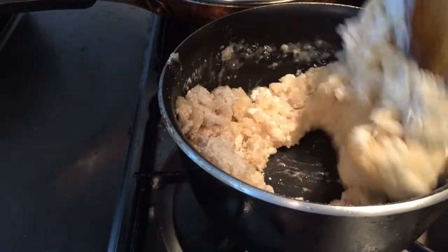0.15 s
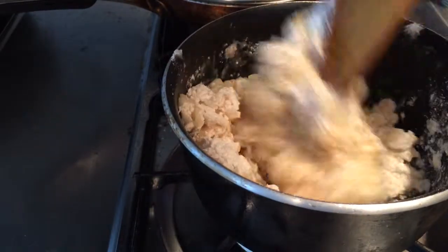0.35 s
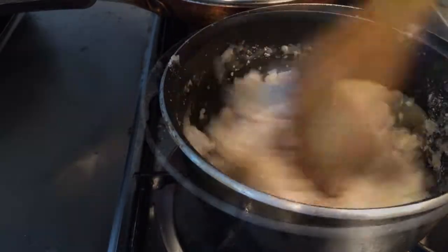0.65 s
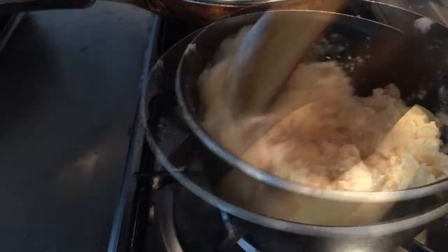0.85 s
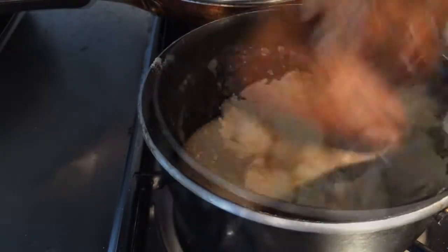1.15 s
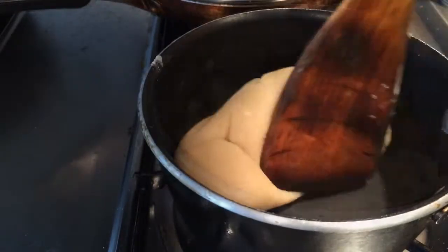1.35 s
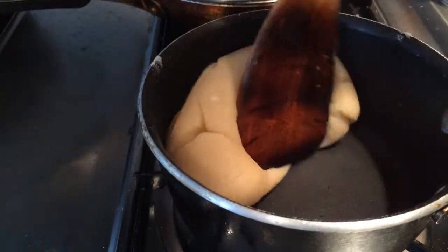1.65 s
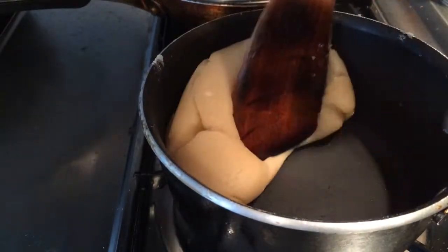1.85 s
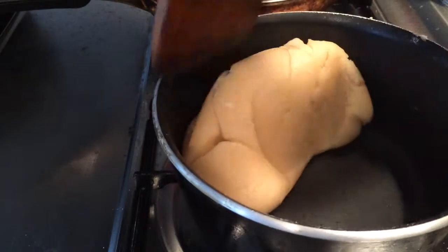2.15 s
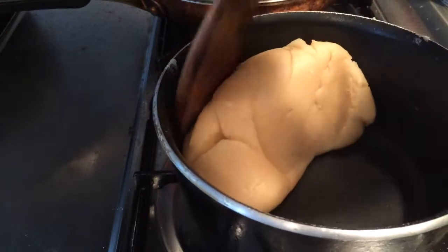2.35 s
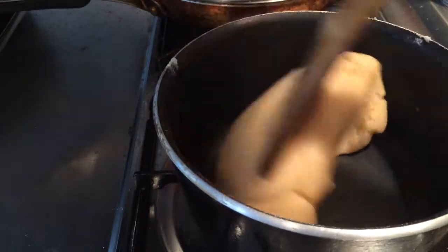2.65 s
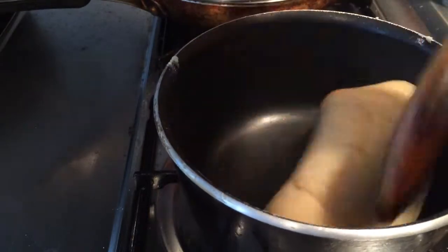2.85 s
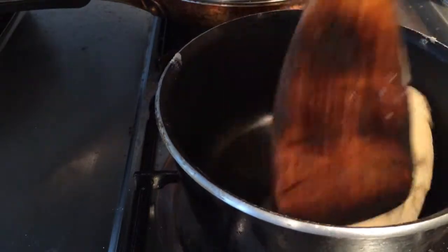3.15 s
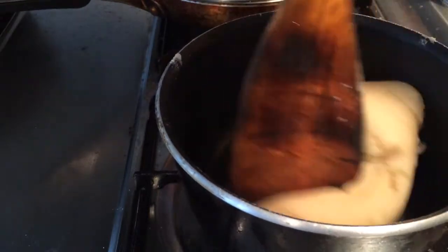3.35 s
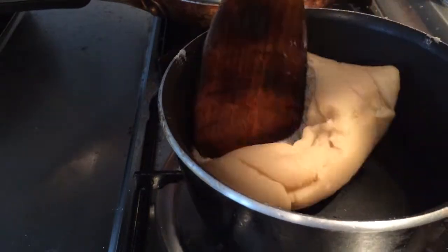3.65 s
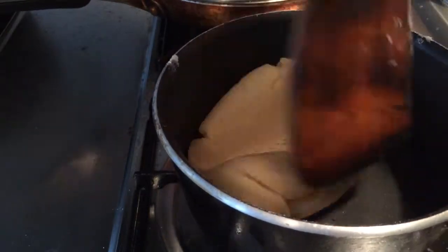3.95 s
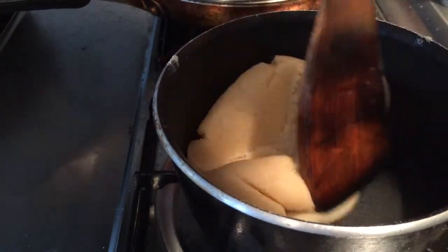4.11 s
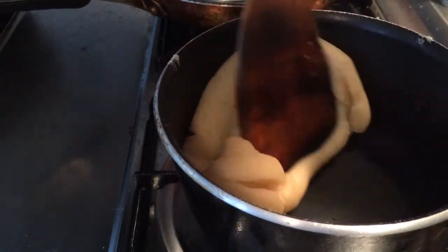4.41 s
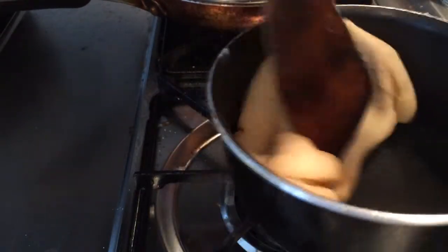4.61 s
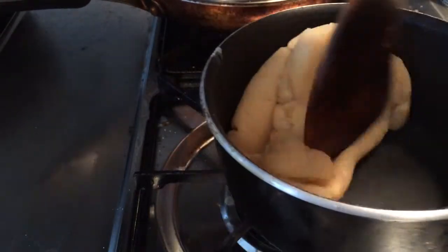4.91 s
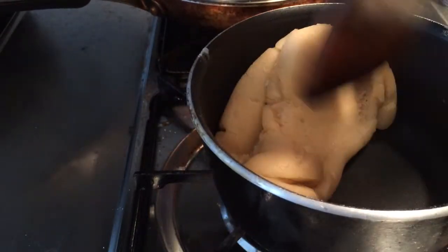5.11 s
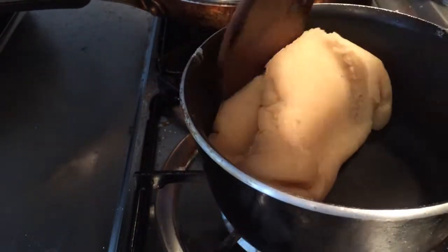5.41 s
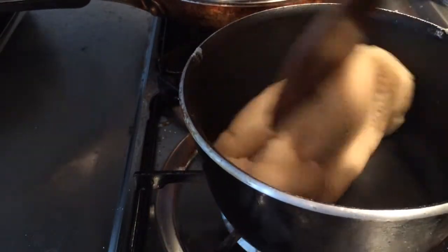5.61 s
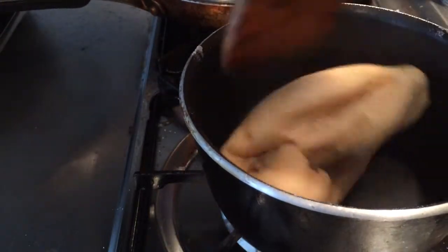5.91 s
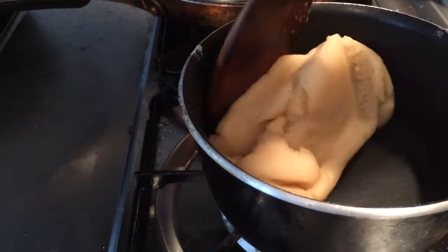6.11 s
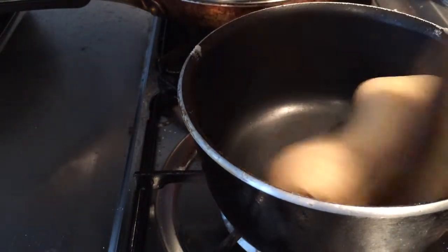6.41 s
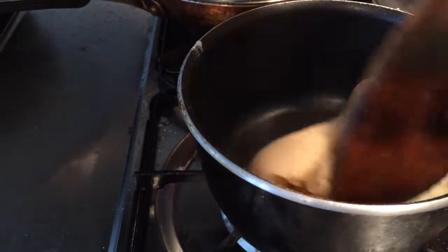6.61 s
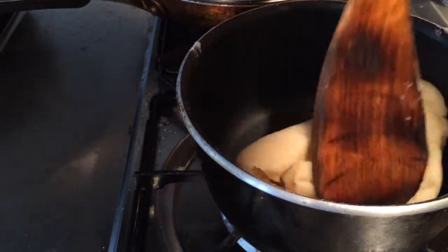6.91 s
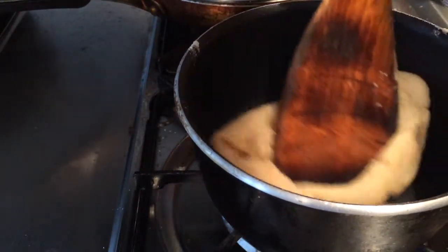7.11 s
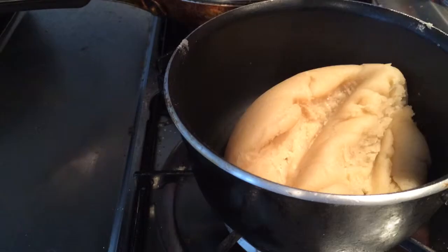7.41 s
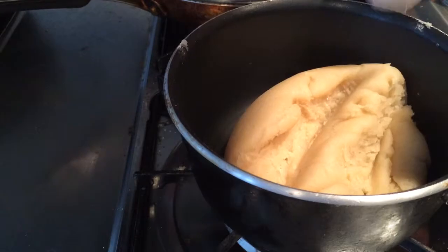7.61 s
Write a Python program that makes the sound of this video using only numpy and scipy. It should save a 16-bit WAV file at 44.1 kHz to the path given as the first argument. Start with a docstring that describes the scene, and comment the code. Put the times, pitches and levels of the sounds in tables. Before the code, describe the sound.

A gas burner rumbles softly throughout, close by in a small kitchen. From the start a wooden spoon rubs through stiff dough in a metal saucepan with a sticky crackle, busiest in the first second, then in quieter, uneven strokes. The spoon knocks the pan at 0.5 seconds, harder at 1.3, again at 2.4, and more lightly at 3.4 and 3.8, each knock short and damped. A small wet smack comes at 1.8, a rasping scrape at 1.9, and two short low groans of slipping wood around 3.3. A very faint gas whistle runs from about 4 to 7 seconds. Around 4.6 a scrape, clustered knocks and a smack jolt the pan on its grate. A loud knock with smaller rebounds lands just after 6. At 7.3 the level dips for an instant and a short swish passes; at 7.6 something hard hits metal with one bright clack.

```python
"""A gas burner rumbles in a small kitchen while a wooden spoon works stiff dough in a metal saucepan.
From the start the blade rubs and the sticky dough crackles; soon the spoon knocks the wall and jolts
the pan on its grate. Then come wet smacks of dough, sudden scrapes and two short groans as the blade
sticks and slips. A faint gas whistle joins halfway. At the end the level dips for an instant,
a short swish passes, and something hard hits metal with one bright clack."""
import sys
import numpy as np
from scipy import signal
from scipy.io import wavfile

SR = 44100
rng = np.random.default_rng(int(sys.argv[2]) if len(sys.argv) > 2 else 0)


def transcribe(u):
    """Save the signal u as a 16-bit wav file named by the first command-line argument.

    u: samples, shape (n,) or (channels, n), limited to [-1, 1]; the rate is SR.
    q: integer samples, one column per channel.
    """
    v = np.clip(np.atleast_2d(u).T, -1, 1)
    q = np.round(v * 32767).astype(np.int16)
    wavfile.write(sys.argv[1], SR, q)


N = 342237
TIME = np.arange(N) / SR


def amp(db):
    """Turns decibels into a gain to multiply by."""
    return 10 ** (np.asarray(db) / 20)

def unit(x):
    """Scales a signal to an average (rms) level of 1."""
    return x / np.sqrt(np.mean(x ** 2) + 1e-20)

def add(mix, start, sound):
    """Mixes a sound in at a start time in seconds."""
    part = mix[max(0, round(start * SR)):][:len(sound)]
    part += sound[:len(part)]

def value_at(points, hz):
    """Reads between rows of frequency and value, on a log-frequency scale."""
    known_hz, values = np.transpose(points)
    return np.interp(np.log(hz + 1), np.log(known_hz + 1), values)

def colour(x, tone, size=4096):
    """Filters a sound to a tone curve; white noise would keep its overall level."""
    log_gain = np.log(amp(value_at(tone, abs(np.fft.fftfreq(size, 1 / SR)))))
    taps = np.fft.ifft(np.exp(np.conj(signal.hilbert(log_gain)))).real[:size // 2]
    return signal.oaconvolve(x, taps / np.linalg.norm(taps))[:len(x)]

def wander(per_s):
    """A random curve that drifts to a new value per_s times a second."""
    times = np.arange(0, N / SR + 1, 1 / per_s)
    return unit(np.interp(TIME, times, rng.standard_normal(N)[:len(times)]))

def clicks(per_s, spread_db):
    """Randomly timed clicks of uneven size."""
    size = amp(spread_db * np.minimum(rng.exponential(1, N), 4))
    return unit(size * rng.choice([-1., 1.], N) * (rng.random(N) < per_s / SR))

def burst(t, decay_s):
    """Noise that starts at once and dies away."""
    return rng.standard_normal(len(t)) * np.exp(-t / decay_s)

def struck(notes):
    """A struck object's notes start together; each fades by 60 dB over its ring time."""
    t = TIME[:SR // 2]
    return sum((-1) ** k * amp(db - 60 * t / ring_s) * np.sin(2 * np.pi * hz * t)
               for k, (hz, db, ring_s) in enumerate(notes))

def ringing(notes, clatter_share, clatter_s):
    """Metal after a tap: a few clear notes over a noisy clatter of many short ones."""
    t = TIME[:SR // 2]
    clatter = rng.choice([-1., 1.], len(t)) * amp(-60 * t / clatter_s) * (1 - np.exp(-t / 0.0035))
    ring = np.sqrt(1 - clatter_share) * unit(struck(notes)) + np.sqrt(clatter_share) * unit(clatter)
    return ring / np.sqrt(len(t))

def push(middle, length):
    """Gain of one push of the arm: it builds, holds and eases off."""
    build_share, ease_share = 0.38, 0.39
    progress = (TIME - middle) / length + .5
    return np.clip(np.minimum(progress / build_share, (1 - progress) / ease_share), 0, 1)

def drag(start, length):
    """Gain of one scrape or press: the blade bites, holds and lets go."""
    bite_s, let_go_s = 0.029, 0.023
    t = TIME - start
    return np.clip(t / bite_s, 0, 1) * np.exp(-np.maximum(t - length, 0) / let_go_s)

# The flame's tone. Each row: frequency in Hz, relative level in dB.
FLAME_TONE = [(20, -32.5), (40, -8.5), (62, 1), (100, 1), (200, -0.5), (310, -5), (500, -12.5),
              (900, -24.5), (2000, -29.5), (5000, -38), (15500, -32.5)]

def burner():
    """The gas flame makes a low, softly fluttering rumble."""
    flutter = amp(1.3 * wander(per_s=12))
    return amp(-56.5) * colour(rng.standard_normal(N), FLAME_TONE) * flutter

# Light contact that never stops, quieter once the crumbs bind into one lump.
# Each row: time in seconds, rubbing in dB, sticky fizz in dB.
LIGHT_CONTACT = [(0, -53.5, -51), (0.55, -56, -57.5), (1.25, -59, -61.5), (1.7, -63, -67.5),
                 (3.1, -68, -77), (6.95, -73.5, -73), (7.5, -65, -62.5), (7.62, -62.5, -71)]
# Strokes through the dough. Each row: middle and length in seconds, rubbing and fizz in dB,
# the pan note it stirs most in Hz.
SPOON_STROKES = [(0.037, 0.23, -44, -50.5, 910), (0.697, 0.083, -48, -54, 1920),
                 (0.83, 0.21, -47.5, -53.5, 930), (1.002, 0.19, -45, -47.5, 943),
                 (1.312, .12, -55, -58, 950), (1.836, 0.043, -57, -66, 905), (2.364, 0.22, -62, -67, 1000),
                 (2.568, 0.12, -78, -49.5, 990), (2.606, 0.089, -61, -42, 960),
                 (2.74, 0.56, -88, -60.5, 936), (2.904, 0.23, -62, -70, 970),
                 (3.49, 0.44, -57.5, -58.5, 1220), (3.581, .11, -44, -58, 927),
                 (3.846, 0.2, -55, -55, 1020), (4.105, 0.071, -67, -61.5, 950),
                 (4.496, 0.52, -68.5, -57.5, 950), (4.802, 0.23, -54, -51, 3120),
                 (5.0, 0.23, -58, -55.5, 960), (5.087, 0.17, -44.5, -48, 935), (5.372, 0.2, -54, -60, 940),
                 (5.475, 0.16, -49, -56, 1970), (5.654, 0.32, -65, -50.5, 930),
                 (5.806, .08, -60.5, -63.5, 990), (5.96, 0.66, -68, -65, 950),
                 (6.29, 0.32, -60.5, -58, 2230), (6.483, 0.15, -57.5, -53.5, 946),
                 (6.625, 0.096, -50, -54.5, 1854), (7.068, 0.16, -61, -71, 930),
                 (7.295, 0.4, -61, -62.5, 943)]
# The blade's edge dragged along the wall.
# Each row: start and length in seconds, then rasp, rubbing and fizz in dB.
WALL_SCRAPES = [(1.935, 0.087, -37.5, -45.5, -39), (3.258, 0.05, -58.5, -48.5, -62.5),
                (3.689, 0.034, -78, -50.5, -63), (4.562, 0.11, -37.5, -36, -34)]

def friction():
    """Gains of rubbing, fizz and rasp: light contact, strokes and scrapes add up in power."""
    times, rub_db, fizz_db = np.transpose(LIGHT_CONTACT)
    rub = amp(np.interp(TIME, times, rub_db)) ** 2
    fizz = amp(np.interp(TIME, times, fizz_db)) ** 2
    rasp = np.zeros(N)
    for middle, length, rub_db, fizz_db, _ in SPOON_STROKES:
        power = push(middle, length) ** 2
        rub += amp(rub_db) ** 2 * power
        fizz += amp(fizz_db) ** 2 * power
    for start, length, rasp_db, rub_db, fizz_db in WALL_SCRAPES:
        power = drag(start, length) ** 2
        rub += amp(rub_db) ** 2 * power
        fizz += amp(fizz_db) ** 2 * power
        rasp += amp(rasp_db) ** 2 * power
    return np.sqrt([rub, fizz, rasp])

def singing():
    """Each stroke brings out one note of the pan, which the dough damps to a fuzzy band."""
    width_hz, below_rub_db = 90, 5.5
    slips = clicks(per_s=3500, spread_db=3.5)
    out = np.zeros(N)
    for middle, length, rub_db, _, hz in SPOON_STROKES:
        note = unit(signal.lfilter(*signal.iirpeak(hz, hz / width_hz, SR), slips))
        out += note * amp(rub_db - below_rub_db) * push(middle, length)
    return out

# Resonances of the air in the pan. Each row: pitch in Hz, width in Hz, level in dB.
PAN_AIR = [(927, 56, 1), (1204, 22, -8.5), (1620, 260, -6), (2075, 130, -0.5)]

def hollow(x):
    """The air in the pan lifts a few bands of a sound."""
    return x + sum(amp(db) * signal.lfilter(*signal.iirpeak(hz, hz / width, SR), x)
                   for hz, width, db in PAN_AIR)

# The pan's dull thud. Each row: frequency in Hz, relative level in dB.
THUD_TONE = [(25, -24), (65, -11.5), (190, 2), (330, -20.5), (600, -18), (2000, -44.5)]
# Shoves against the pan. Each row: middle in seconds, length in seconds, level in dB.
DOUGH_SHOVES = [(0.056, 0.24, -47), (0.499, 0.15, -48), (4.58, 0.064, -52.5), (4.7, 0.1, -38)]

def shoves():
    """The lump of dough shoves the pan about with a low noise."""
    gain = sum(amp(db) * push(middle, length) for middle, length, db in DOUGH_SHOVES)
    return colour(rng.standard_normal(N), THUD_TONE) * gain

# Tones of rubbing wood, sticky dough and the scraping edge.
# Each row: frequency in Hz, relative level in dB.
RUB_TONE = [(40, -18.5), (110, 3.5), (350, -6.5), (600, 1), (950, 0), (1400, -4), (2200, -6.5),
            (3300, -7.5), (5000, -11), (9000, -15), (16000, -48)]
FIZZ_TONE = [(300, -45.5), (1500, -8.5), (3000, -5.5), (5000, -4), (8000, -1), (11000, -2), (15500, -1)]
RASP_TONE = [(300, -37), (1000, -1), (2200, -4.5), (3050, -0.5), (3600, 0.5), (4300, -17.5), (5000, -5.5),
             (6400, -13), (7900, -7.5), (9500, -19.5), (15500, -23.5)]
# The pan's notes, damped by dough. Each row: pitch in Hz, relative level in dB, ring time in seconds.
PAN_NOTES = [(484, -4.5, .16), (665, 1, .22), (877, -1, .3), (981, 3, .22), (1108, -3, .14),
             (1268, 4.5, .24), (1640, 7, .1), (1790, 2, .12), (1970, 1, .27), (2280, 3, .22), (3100, 2, .3),
             (3550, -5, .16), (4180, -12, .22), (4900, -6, .2), (6400, -7.5, .12), (8035, 1, .09),
             (8680, -2, .1)]

def stirring():
    """Tiny slips of the spoon ring the pan; dough peeling off the metal fizzes and ticks."""
    rub_gain, fizz_gain, rasp_gain = friction()
    grip = amp(2.2 * np.tanh(wander(per_s=110)))
    slips = colour(clicks(per_s=3500, spread_db=0.5), RUB_TONE)
    rub = unit(hollow(slips)) * grip * rub_gain
    wet_film = clicks(per_s=11000, spread_db=4.0)
    bubbles = amp(-4.5) * clicks(per_s=67, spread_db=6.5)
    fizz = colour(unit(wet_film + bubbles), FIZZ_TONE) * fizz_gain * amp(1.3 * wander(per_s=140))
    rasp = colour(clicks(per_s=3100, spread_db=3.5), RASP_TONE) * rasp_gain
    thuds = shoves()
    contact = rub + singing() + fizz + rasp
    pan = ringing(PAN_NOTES, clatter_share=0.91, clatter_s=0.034)
    return contact + thuds + amp(-9.0) * signal.oaconvolve(contact, pan)[:N]

# Notes of the wooden spoon, and of the pan rocking on its grate.
# Each row: pitch in Hz, relative level in dB, ring time in seconds.
SPOON_NOTES = [(482, -4.5, 0.03), (594, -2, 0.02), (1408, 5, 0.0066), (1797, 1, 0.0087),
               (2318, -3.5, 0.013), (3020, -7.5, 0.0095)]
GRATE_NOTES = [(73.4, -3.5, 0.35), (125.5, -1.5, 0.18), (152, -1.5, 0.1), (217.6, -6.5, 0.36),
               (350.8, -3.5, 0.17)]
# Knocks of spoon on pan. Each row: start in seconds, strength in dB, pitch in Hz,
# then sharp crack, low thud and wooden clack in dB relative to that strength.
SPOON_KNOCKS = [(0.489, -15.5, 1110, -23, -21, -11.5), (0.569, -37.5, 1000, -16, -8, -6.5),
                (1.298, -32.5, 1001, -22, -7.5, -10), (1.349, -4.5, 1230, -18.5, -24, -8.5),
                (2.273, -29, 475, -28, -19, -19), (2.408, -12, 722, -29.5, -41, -16.5),
                (3.152, -47.5, 404, -8.5, -33.5, -8), (3.44, -22, 980, -26, -16, -8),
                (3.834, -26.5, 930, -15.5, 3, -3.5), (3.853, -16.5, 980, -29, -11.5, -5.5),
                (3.855, -18.5, 2920, -16.5, -27, -34), (4.575, -21, 420, -3, -1, -9),
                (4.636, -14.5, 980, -20, -19, -13), (4.676, -12, 1010, -21.5, -11.5, -11),
                (4.692, -12, 3060, -7, -27, -11), (4.81, -26.5, 1610, -15.5, -35, -20),
                (6.0515, -3, 1282, -11, -31, -7), (6.0967, -14, 745, -24.5, -19, -11.5),
                (6.118, -17.5, 584, -16, -14, -7.5), (6.516, -23.5, 930, -25, -11.5, -0.5)]

def knocks():
    """Wood hits metal: a very short note, a crack, a thud through the grate and a ringing pan."""
    out, t = np.zeros(N), TIME[:SR // 2]
    for start, db, hz, crack_db, thud_db, wood_db in SPOON_KNOCKS:
        cycles = hz * t
        note = np.sin(2 * np.pi * cycles) * np.exp(-cycles / 1.67) * (1 - np.exp(-cycles / 0.53))
        snap_and_chatter = 8 * signal.unit_impulse(len(t)) + 1.3 * burst(t, decay_s=0.0027)
        crack = amp(crack_db) * colour(snap_and_chatter, CRACK_TONE)
        jolt = 0.36 * struck(GRATE_NOTES) + 0.32 * colour(burst(t, decay_s=0.011), THUD_TONE)
        blow = 1.16 * note + crack + amp(wood_db) * struck(SPOON_NOTES)
        pan = ringing(PAN_NOTES, clatter_share=0.99, clatter_s=.06)
        ring = signal.fftconvolve(blow, pan)[:len(t)]
        add(out, start, amp(db) * (blow + amp(thud_db) * jolt + amp(-1.5) * ring))
    # so small a pan gives off almost no deep bass
    return signal.sosfilt(signal.butter(2, 48, "highpass", fs=SR, output="sos"), out)

# Dough letting go of the blade. Each row: start in seconds, strength in dB.
WET_SMACKS = [(1.77, -31.5), (3.282, -34.5), (3.809, -39), (4.686, -21.5)]

def smacks():
    """A pocket in the dough tears open with a bright spit of fizz."""
    out = np.zeros(N)
    for start, db in WET_SMACKS:
        add(out, start, amp(db) * burst(TIME[:SR // 8], decay_s=0.0062))
    return colour(out, FIZZ_TONE)

# Presses of the blade. Each row: start in seconds, length in seconds, level in dB.
BLADE_PRESSES = [(3.257, 0.049, -41.5), (3.336, 0.051, -45.5)]

def groan():
    """The blade sticks and slips unevenly: a rough low note that falls as it sinks in."""
    start_hz, fall_hz_per_s = 260, 570
    hz = start_hz - fall_hz_per_s * np.clip(TIME - BLADE_PRESSES[0][0], 0, .5)
    cycles = np.cumsum(hz * (1 + .14 * wander(per_s=260))) / SR
    note = hollow(sum(np.sin(2 * np.pi * k * cycles) / k ** 1.72 for k in range(1, 10)))
    return unit(note) * sum(amp(db) * drag(start, length) for start, length, db in BLADE_PRESSES)

def gas_whistle():
    """A faint, thin whistle comes and goes with the gas."""
    hz = 4115 + 14 * wander(per_s=45)
    level_db = np.interp(TIME, [3.9, 4.2, 7.0, 7.3], [-105, -78, -79, -105])
    return np.sin(2 * np.pi * np.cumsum(hz) / SR) * amp(level_db)

def room_tail():
    """Half a second of noise that dies as sound does between hard walls: treble first."""
    ring_s_by_hz = [(100, 0.69), (700, 0.36), (2000, 0.44), (5000, 0.38), (13000, 0.13)]
    hz, t, bands = signal.stft(rng.standard_normal(SR // 2), SR, nperseg=256)
    fade = amp(-60 * t / value_at(ring_s_by_hz, hz)[:, None])
    noise = signal.istft(bands * fade, SR, nperseg=256)[1]
    return noise / np.linalg.norm(noise)

def swish():
    """A sudden wash of noise swells briefly and darkens as it dies in the room."""
    db_by_hz = [(70, 2.5), (450, -10), (950, -0.5), (2000, 1.5), (2900, -6), (7000, -4), (15500, -9.5)]
    out, wash = np.zeros(N), room_tail()
    swell = 1 - np.exp(-TIME[:len(wash)] / 0.013)
    add(out, 7.334, amp(1) * wash * swell)
    return colour(out, db_by_hz)

# The clack's contacts. Each row: start in seconds, strength in dB.
CLACK_HITS = [(7.6442, -14), (7.6461, -4), (7.6509, -13.5)]
# Its notes. Each row: pitch in Hz, relative level in dB, ring time in seconds.
CLACK_NOTES = [(787, -1.5, 0.074), (1200, -9, .08), (1895, -1.5, 0.2), (3530, 17, 0.028), (4730, 1.5, 0.11),
               (6200, -14, 0.034), (5900, -12, 0.055), (7900, -3, 0.026), (7740, 17.5, 0.023),
               (10600, 12.5, 0.041)]
# Its overall tone. Each row: frequency in Hz, relative level in dB.
CLACK_TONE = [(40, -6), (150, -7), (400, -3.5), (900, -0.5), (2000, 0.5), (4200, -7), (6500, 0),
              (9000, -0.5), (11300, -8.5), (12400, 1), (13500, -10), (15500, -9)]

def clack():
    """Something hard snaps against metal in three quick contacts; the strongest sets it ringing."""
    hits = np.zeros(N)
    for start, db in CLACK_HITS:
        add(hits, start, amp(db) * burst(TIME[:SR // 4], decay_s=0.0018))
    strongest_at = CLACK_HITS[1][0]
    add(hits, strongest_at, amp(8.0) * ringing(CLACK_NOTES, clatter_share=0.35, clatter_s=0.11))
    out = colour(hits, CLACK_TONE)
    add(out, strongest_at, amp(-34.0) * struck(GRATE_NOTES))
    return out

def kitchen(x):
    """The walls send the sound back a few milliseconds late."""
    out = np.zeros(N)
    add(out, .007, signal.oaconvolve(x, room_tail()))
    return out

def scene():
    """Mixes the pan sounds and their echo with the swish and the gas, in one channel."""
    near = stirring() + groan() + smacks() + knocks() + clack()
    return (near + amp(-15.5) * kitchen(near) + swish() + burner() + gas_whistle())[None]

def record(dry):
    """The level dips just before the swish, the loudest peaks clip, and the top treble is cut."""
    dip_db = np.interp(TIME, [7.312, 7.332, 7.336], [0, -26, 0])
    clipped = np.clip(dry * amp(dip_db), -1, 1)
    lowpass = signal.firwin(401, cutoff=15550, window=("kaiser", 9), fs=SR)
    return signal.oaconvolve(clipped, lowpass[None], "same")

# The crack of wood on metal. Each row: frequency in Hz, relative level in dB.
CRACK_TONE = [(200, -26.5), (1000, 3), (2800, 9), (4600, 3), (8500, -5.5), (11500, -14.5), (15500, -13.5)]

dry = scene()
out = record(dry)
transcribe(out)
```